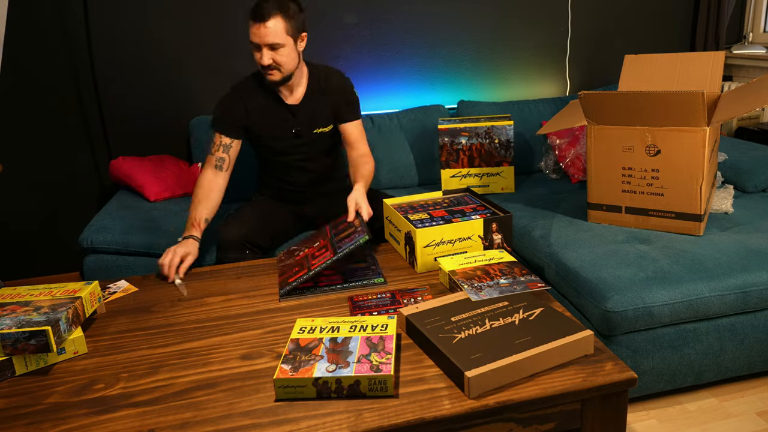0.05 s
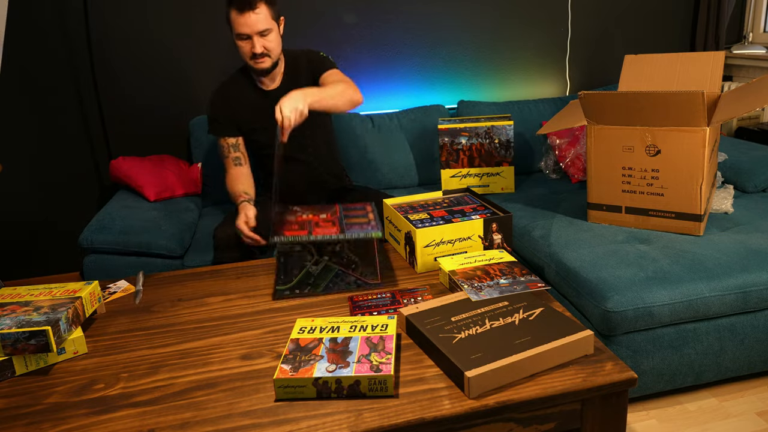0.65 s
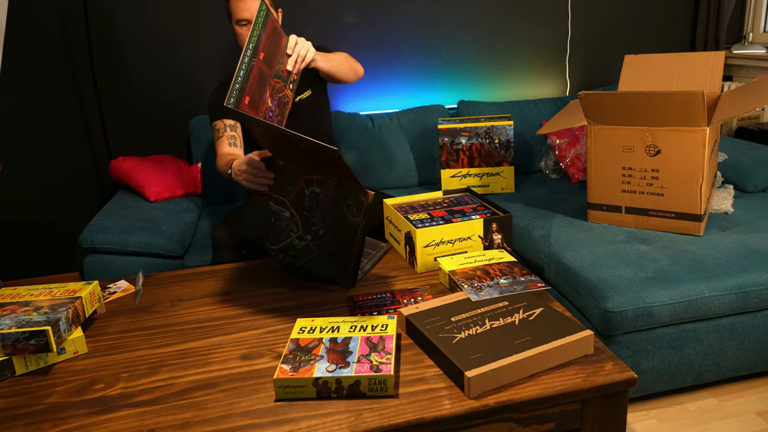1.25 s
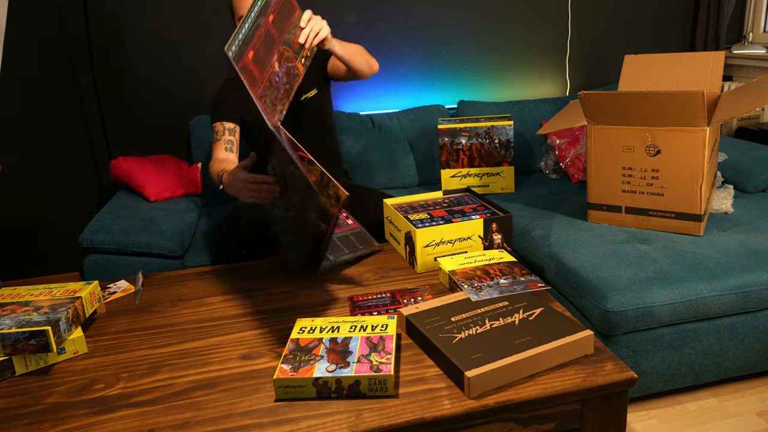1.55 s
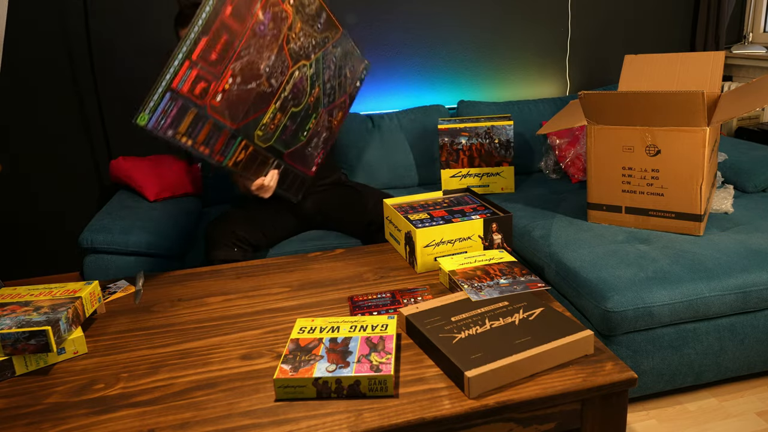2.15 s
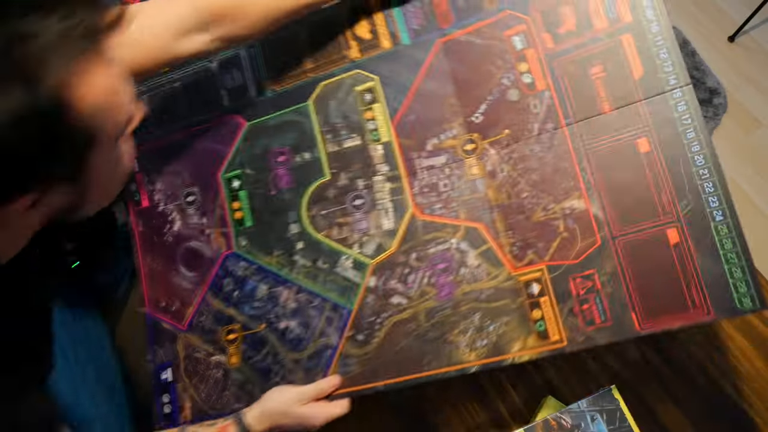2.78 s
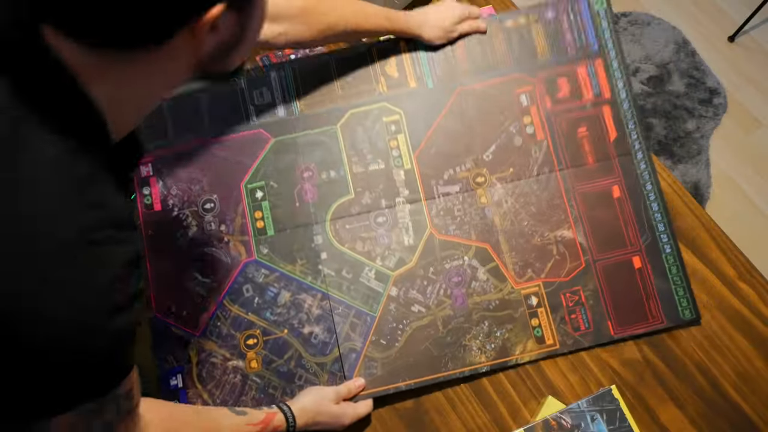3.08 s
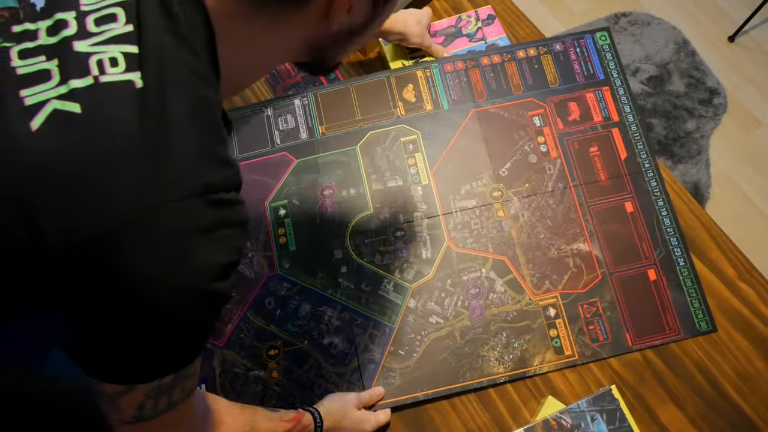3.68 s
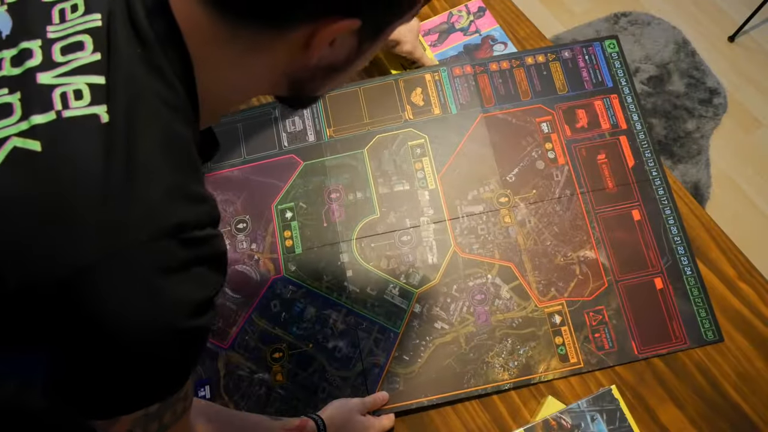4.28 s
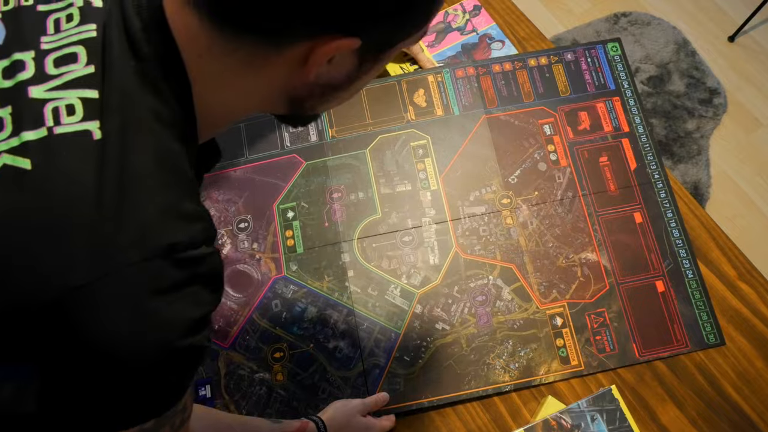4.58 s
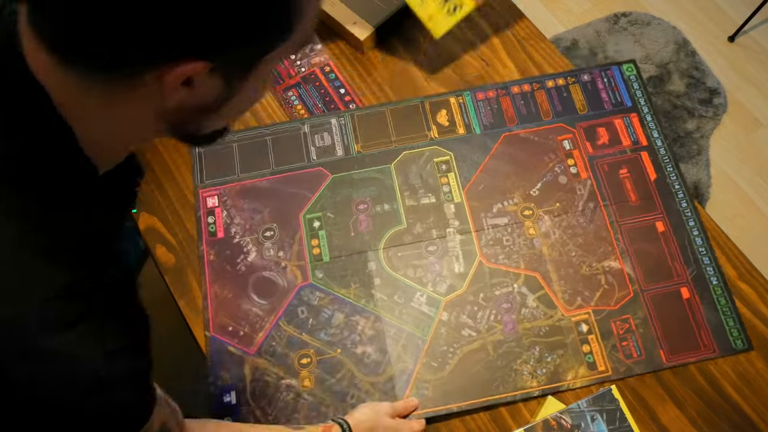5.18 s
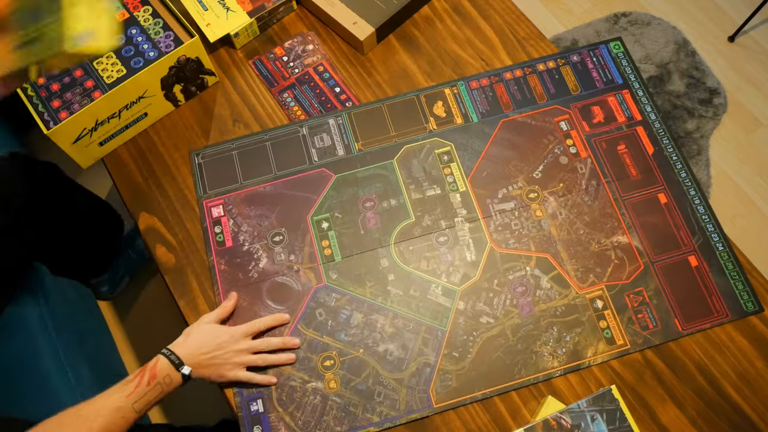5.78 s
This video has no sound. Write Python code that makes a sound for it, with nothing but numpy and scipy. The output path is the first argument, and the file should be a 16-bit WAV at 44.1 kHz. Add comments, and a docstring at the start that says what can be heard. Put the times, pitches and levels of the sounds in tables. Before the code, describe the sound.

A folded cardboard board knocks against a wooden table, with a few faint metallic clinks at first. Hands and sleeves brush over it while the panels flex, thump and fan the air, and the hinge groans briefly. About halfway it lands with the loudest knock, rattles and glides a little. Smaller taps follow, then a box is pushed aside and claps down, and light rubbing ends it. Heard through one microphone in a softly furnished room.

```python
"""A big folded cardboard game board is opened, swung through the air and dropped on a wooden table.
Its edges knock, its panels thud, chatter and fan the air, a hinge sticks and slips in a groan.
Hands and sleeves rub over it, and it judders and glides on the wood. Small metal things clink at first;
near the end a game box is pushed aside and set down with a clap. One microphone, a soft living room."""
import sys
import numpy as np
from scipy import signal
from scipy.fft import rfft, irfft
from scipy.io import wavfile
from scipy.ndimage import uniform_filter1d

SR = 44100
rng = np.random.default_rng(int(sys.argv[2]) if len(sys.argv) > 2 else 0)


def inscribe(sig):
    """Save sig as 16-bit PCM at rate SR to the path in sys.argv[1].

    A 1-D sig is mono; a 2-D sig holds one channel per row.
    Samples are clipped to [-1, 1] before scaling.
    """
    pcm = np.round(np.clip(np.atleast_2d(sig).T, -1, 1) * 32767)
    wavfile.write(sys.argv[1], SR, pcm.astype(np.int16))


N = 261733
TIME_S = np.arange(N) / SR
RING_S = TIME_S[:SR // 2]

# edges striking the table (time [s], body peak [dB], spot pitch [Hz], crack level [dB])
KNOCKS = [(0.212, -36, 525, -47.5), (0.265, -22, 476, -40), (0.339, -26, 920, -44), (0.349, -24, 467, -50),
          (0.948, -27.5, 434, -47), (0.979, -38, 360, -46.5), (1.758, -32.5, 786, -46),
          (1.77, -43, 704, -36), (1.778, -20.5, 379, -35), (1.894, -30, 417, -45.5), (1.967, -39, 422, -48),
          (2.273, -35.5, 610, -50), (2.794, -15, 470, -31), (3.104, -28, 790, -43),
          (3.197, -23, 420, -40.5), (3.292, 0.5, 448, -34.5), (3.306, -9.5, 444, -35.5),
          (3.312, -17.5, 376, -18), (3.367, -18, 576, -27.5), (3.376, -16.5, 377, -44),
          (3.424, -17.5, 447, -40), (3.573, -24, 406, -36.5), (3.595, -14, 480, -38.5),
          (3.641, -33.5, 436, -44), (3.859, -29, 398, -54), (4.05, -33, 402, -52),
          (4.269, -24.5, 498, -34.5), (4.277, -24.5, 816, -38.5), (4.293, -19, 382, -47),
          (4.323, -26.5, 407, -54), (4.661, -32.5, 414, -58), (4.714, -16, 477, -42),
          (4.743, -17.5, 393, -33.5), (4.756, -22, 400, -29.5), (4.839, -18.5, 553, -38),
          (4.869, -24, 580, -42.5), (5.324, -37.5, 775, -44), (5.351, -49, 700, -42),
          (5.823, -31, 565, -42)]
# board on the table (frequency [Hz], level [dB], t60 [s])
BOARD_MODES = [(177.3, -16, 0.21), (397, -9.5, 0.28), (468, -5.5, 0.072), (550, -3, 0.066),
               (670, -7, 0.081), (1006, -19.5, 0.06), (1187, -20, 0.057), (1665, -33, 0.09)]
# cardboard crack spectrum (frequency [Hz], level [dB])
CRACK_EQ = [(200, -11), (700, 11), (1100, 3), (1450, 2), (1900, 1.5), (2700, -3), (3400, -6), (4200, -13.5),
            (6000, -19), (10000, -28.5), (14000, -26), (16000, -53)]

def knocks(board_db=-13, crack_gain_db=11, ping_hz=1380, ping_db_per_oct=41, scatter_oct=0.17,
           contact_s=0.00091, lag_s=0.001207, spot_cycles=16, ping_cycles=22):
    """The edge cracks and pings, lower on soft contact; the struck spot rings briefly, the board longer."""
    out = np.zeros(N)
    for s, db, spot_hz, crack_db in KNOCKS:
        edge_hz = ping_hz * 2 ** ((crack_db - db) / ping_db_per_oct + scatter_oct * rng.standard_normal())
        ping = np.sin(2 * np.pi * edge_hz * RING_S) * fade(RING_S, ping_cycles / edge_hz)
        spot = np.sin(2 * np.pi * spot_hz * RING_S) * fade(RING_S, spot_cycles / spot_hz)
        board = undb(board_db) * ring(BOARD_MODES, scatter_db=5.5)
        onset = 1 - np.exp(-RING_S / contact_s)  # soft card passes the blow on gradually
        body = peaked((spot + board) * onset, db)
        crunch = peaked(crack(CRACK_EQ, t60_s=0.027), crack_db + crack_gain_db)
        add(out, s + lag_s, body + peaked(ping, crack_db + 1) + crunch)
    return out

# panels flexing (time [s], level [dB], pitch [Hz])
THUDS = [(.950, -29, 211), (.957, -28.5, 148), (1.782, -16, 101), (1.838, -23, 100.7), (1.867, -35, 150),
         (2.121, -29.5, 221), (2.14, -33, 137), (2.177, -27.5, 92), (2.274, -35.5, 195), (2.62, -29, 88),
         (2.672, -23, 90), (2.797, -23, 136), (2.802, -18, 303), (3.015, -26, 151.7), (4.294, -27.5, 264),
         (4.757, -26.5, 203), (5.001, -34, 207), (5.612, -30, 165), (5.791, -32.5, 93.5),
         (5.821, -32.5, 185), (5.906, -30.5, 231)]
# one panel (frequency [x pitch], level [dB], t60 [s])
PANEL_MODES = [(1, 3.5, 0.1), (1.45, -10, 0.13), (2.2, -5, 0.07), (3.3, -11.5, 0.069), (5.4, -18.5, 0.039)]

def thuds(gain_db=-1, contact_s=0.00097):
    """A panel swings to its stop and wobbles like a drum skin."""
    out = np.zeros(N)
    onset = 1 - np.exp(-RING_S / contact_s)
    for s, db, hz in THUDS:
        wobble = ring(PANEL_MODES, scatter_db=1.5, pitch=hz)
        add(out, s, peaked(wobble * onset, db + gain_db))
    return out

# hinge stick-slip (time [s], slip rate [Hz])
HINGE_SLIPS = [(2.355, 572), (2.415, 376.4), (2.445, 334), (2.494, 654), (2.52, 632), (2.562, 347),
               (2.608, 294)]

def hinge_groan(level_db=-29, db_per_oct=-9.5, fade_s=0.044):
    """The taped hinge sticks and slips at a sliding, unsteady rate; quicker slips are weaker."""
    s, hz = np.transpose(HINGE_SLIPS)
    rate_hz = np.interp(TIME_S, s, hz) * (1 + 0.03 * walk(220))
    bending = np.clip(np.minimum(TIME_S - s[0], s[-1] - TIME_S) / fade_s, 0, 1)
    gain = bending * undb(level_db + db_per_oct * np.log2(rate_hz / hz.min()) + 1.8 * walk(130))
    return gain * np.sin(2 * np.pi * np.cumsum(rate_hz) / SR)

# box corners landing (time [s], peak [dB])
BOX_CORNERS = [(5.1626, -19), (5.1645, -11), (5.1666, -17.5)]
# hollow box (frequency [Hz], level [dB], t60 [s])
BOX_MODES = [(350, -9, .04), (689, -4, .04), (2470, 0, .012)]

def box_ring(crack_db=-4):
    """Each corner cracks, and the hollow box gives a short note."""
    out = np.zeros(N)
    for s, db in BOX_CORNERS:
        note = ring(BOX_MODES, scatter_db=1)
        crunch = crack(CRACK_EQ, t60_s=0.022)
        add(out, s, peaked(note, db) + peaked(crunch, db + crack_db))
    return out

# clap spectrum (frequency [Hz], level [dB])
CLAP_EQ = [(120, 0), (650, 3), (1300, -4), (2000, -4), (2700, -3), (4000, -9), (6300, -16), (8000, -26),
           (16000, -35)]

def box_clap(time_s=5.165, peak_db=-9):
    """The flat bottom of the box lands with one pressure pulse."""
    out = np.zeros(N)
    pulse = colour(signal.unit_impulse(len(RING_S)), CLAP_EQ)
    add(out, time_s, peaked(pulse, peak_db))
    return out

def chatter(level_db=-14.5, db_per_db=1.255, length_s=0.1, pitch_hz=5020, db_per_oct=19, hiss_db=-24):
    """Loose panels chatter after each crack, softer and lower after a weak one; rows as in STROKES."""
    rows = []
    for s, _, _, crack_db in KNOCKS:
        db = level_db + db_per_db * crack_db
        hz = pitch_hz * 2 ** (crack_db / db_per_oct)
        rows.append((s + length_s / 2, length_s, db, hz, db + hiss_db))
    return rows

# hands and sleeves on card (centre [s], length [s], level [dB], panel resonance [Hz], hiss level [dB])
STROKES = [(0.04, 0.19, -52, 900, -88), (0.18, 0.21, -55, 1530, -56.5), (0.36, 0.23, -43.5, 1000, -80),
           (0.856, 0.55, -62.5, 1180, -60.5), (1.165, 0.21, -52.5, 1670, -60), (1.664, 0.3, -55, 1380, -75),
           (1.755, 0.081, -49, 1330, -57), (2.277, 0.32, -48.5, 790, -53.5), (2.503, 0.33, -46, 705, -51),
           (2.735, 0.22, -47.5, 655, -57.5), (3.24, 0.48, -52.5, 1110, -56.5),
           (3.637, 0.26, -58.5, 980, -75), (4.138, 0.24, -64, 2500, -63), (4.33, 0.14, -49.5, 860, -75),
           (4.785, 0.16, -49.5, 1880, -58), (5.03, 0.27, -49, 810, -60), (5.39, 0.26, -60, 1650, -51.5),
           (5.61, 0.43, -51, 850, -58), (5.817, 0.24, -43, 1490, -54)]
# sleeve friction spectrum (frequency [Hz], level [dB])
SLEEVE_EQ = [(300, -8.5), (700, 2), (1200, 2.5), (1700, -4), (2300, -6.5), (4000, -13), (5800, -18),
             (8000, -25.5), (14000, -67)]
# bright spectrum of skin hiss and ticks (frequency [Hz], level [dB])
BRIGHT_EQ = [(3000, 8.5), (6000, 4.5), (8000, -0.5), (10500, -1), (12500, 2.5), (14000, 6.5), (16000, 1)]

def rubbing(rows, resonance_db=-4, q=7, grip_db=2.5):
    """Each rub swells and fades: tiny slips ring the panel, and the printed surface hisses."""
    slips = reflected(colour(grains(rate_hz=14000, spread_db=3), SLEEVE_EQ))
    hiss = reflected(colour(grains(rate_hz=18000, spread_db=1), BRIGHT_EQ))
    out = np.zeros(N)
    for s, length_s, db, hz, hiss_db in rows:
        on = np.abs(TIME_S - s) < length_s / 2
        swell = np.cos(np.pi * (TIME_S[on] - s) / length_s)
        panel = unit(signal.lfilter(*signal.iirpeak(hz, q, fs=SR), slips[on]))
        rub = unit(slips[on] + undb(resonance_db) * panel)
        out[on] += swell * (undb(db) * rub + undb(hiss_db) * hiss[on])
    return out * undb(grip_db * walk(45))

# small metal things touching (time [s], level [dB], tilt [dB/oct])
CLINKS = [(.082, -36.5, 6), (0.088, -39, 5), (.106, -39, 6), (.263, -36, 2), (0.292, -39.5, 1),
          (.313, -38.5, -2), (.339, -38.5, -8)]
# thin metal (frequency [Hz], level [dB], t60 [s])
METAL_MODES = [(3424, 2, 0.29), (5656, -3, 0.078), (7920, 8, 0.043), (9420, -10, 0.15), (13100, -12, 0.11),
               (13300, 4, 0.023), (15400, -20, .2)]

def clinks(jangle_db=1, jangle_t60_s=0.087, partials=26, tick_db=-9, tick_t60_s=0.014):
    """Thin metal: a bright tick, a few fixed tones and a jangle that differs with each touch."""
    out = np.zeros(N)
    base_hz = METAL_MODES[0][0]
    for s, db, tilt in CLINKS:
        modes = [(hz, mode_db + tilt * np.log2(hz / base_hz), t60_s) for hz, mode_db, t60_s in METAL_MODES]
        jangle_hz = rng.uniform(2700, 14000, partials)
        jangle_modes = [(hz, (tilt - 3) * np.log2(hz / base_hz), jangle_t60_s) for hz in jangle_hz]
        tick = colour(rng.standard_normal(len(RING_S)) * fade(RING_S, tick_t60_s), BRIGHT_EQ)
        tones = ring(modes, scatter_db=1.5)
        jangle = ring(jangle_modes, scatter_db=9)
        add(out, s, peaked(tones, db) + peaked(jangle, db + jangle_db) + peaked(tick, db + tick_db))
    return out

# fingernail catches (time [s], peak [dB])
NAIL_TICKS = [(3.775, -42), (4.24, -39), (4.762, -28), (4.87, -29), (5.508, -40), (5.79, -35)]

def nail_ticks():
    """A fingernail catches crisply on the glossy print."""
    out = np.zeros(N)
    for s, db in NAIL_TICKS:
        add(out, s, peaked(crack(BRIGHT_EQ, t60_s=0.012), db))
    return out

# card pushed over the table (centre [s], length [s], level [dB])
PUSHES = [(0.04, 0.39, -51.5), (0.37, 0.17, -43.5), (1.74, 0.055, -46.5), (2.5, 0.67, -47.5),
          (4.17, 0.22, -49.5), (5.03, 0.17, -39.5), (5.58, 0.28, -46), (5.8, 0.15, -41)]
# edge friction spectrum (frequency [Hz], level [dB])
DRAG_EQ = [(120, -15.5), (260, -3), (400, -0.5), (520, -2), (680, -7.5), (900, -14), (2000, -45.5)]

def drag(skid_db=-34, db_per_db=0.7, skid_lag_s=0.054, skid_s=0.11, judder_db=1.5):
    """The edge judders over the wood when pushed, and skids briefly after each knock."""
    skids = [(s + skid_lag_s, skid_s, skid_db + db_per_db * db) for s, db, _, _ in KNOCKS]
    motion = gestures(PUSHES + skids, rest_db=-60)  # the held board never lies quite still
    judder = undb(judder_db * walk(45))
    friction = unit(colour(grains(rate_hz=3000, spread_db=2), DRAG_EQ))
    return motion * judder * friction

# board sliding flat (time [s], level [dB], squeal pitch [Hz])
GLIDE = [(3.36, -61, 15400), (3.45, -52.5, 14200), (3.6, -58, 11600), (3.71, -57.5, 12600),
         (3.82, -59.5, 11000), (4.0, -59, 10800), (4.05, -64, 9900)]
# varnish hiss spectrum (frequency [Hz], level [dB])
GLIDE_EQ = [(2000, -5), (3000, -0.5), (3800, -4.5), (4500, 3), (5100, -4.5), (5900, 3.5), (6600, -14),
            (7500, -13.5)]

def glide(squeal_db=-13):
    """The board's smooth back hisses over the varnish; a thin wavering squeal sinks as it slows."""
    s, db, hz = np.transpose(GLIDE)
    pitch_hz = np.interp(TIME_S, s, hz) * (1 + 0.008 * walk(300))
    squeal = undb(3 * walk(40)) * np.sin(2 * np.pi * np.cumsum(pitch_hz) / SR)
    hiss = unit(colour(rng.standard_normal(N), GLIDE_EQ))
    gain = undb(np.interp(TIME_S, s, db, left=-120, right=-120))
    return gain * (hiss + undb(squeal_db) * squeal)

def swish(time_s=2.74, length_s=0.17, level_db=-54, centre_hz=14200, q=8):
    """One fast light brush over the print gives a narrow, very high hiss."""
    hiss = signal.lfilter(*signal.iirpeak(centre_hz, q, fs=SR), rng.standard_normal(N))
    return gestures([(time_s, length_s, level_db)], rest_db=-np.inf) * unit(hiss)

# panel swings (centre [s], length [s], level [dB])
SWINGS = [(1.8, 0.17, -40.5), (2.35, 0.38, -50.5), (2.77, 0.39, -39.5), (3.5, 0.69, -50), (5.64, .1, -40.5),
          (5.81, 0.094, -38.5)]
# fanned air spectrum (frequency [Hz], level [dB])
AIR_EQ = [(20, -30), (45, 6.5), (90, 7), (170, 5), (280, 0.5), (600, -37)]

def draught():
    """The big panels fan air over the table."""
    return gestures(SWINGS, rest_db=-62.5) * unit(colour(rng.standard_normal(N), AIR_EQ))

# room decay (frequency [Hz], t60 [s])
ROOM_DECAY = [(100, 0.7), (400, 0.47), (1500, 0.43), (4000, 0.47), (14000, 0.83)]

def room_response(delay_s=0.007, build_s=0.0014):
    """Diffuse living-room echo of unit energy, fading octave by octave."""
    hz, t60_s = np.transpose(ROOM_DECAY)
    t = TIME_S[:SR]
    spectrum = rfft(rng.standard_normal(SR))
    bins_hz = np.arange(SR // 2 + 1)
    tail = np.zeros(SR)
    for low_hz in 40 * 2 ** np.arange(9):
        band = irfft(spectrum * ((bins_hz >= low_hz) & (bins_hz < 2 * low_hz)), SR)
        tail += band * fade(t, np.interp(np.log(low_hz * np.sqrt(2)), np.log(hz), t60_s))
    tail *= 1 - np.exp(-np.maximum(t - delay_s, 0) / build_s)
    return tail / np.sqrt(np.sum(tail ** 2))

# background spectrum (frequency [Hz], level [dB])
ROOM_TONE_EQ = [(20, -25), (60, -9), (150, 2), (450, -10), (1200, -1.5), (3000, -11.5), (8000, -18),
                (16000, -20.5)]

def room_tone(level_db=-61):
    """Faint steady noise of the room."""
    return undb(level_db) * unit(colour(rng.standard_normal(N), ROOM_TONE_EQ))

def ring(modes, scatter_db, pitch=1):
    """Decaying modes; each blow lands elsewhere and weights them differently."""
    offsets_db = scatter_db * rng.standard_normal(len(modes))
    return sum(undb(db + offset_db) * np.sin(2 * np.pi * hz * pitch * RING_S) * fade(RING_S, t60_s)
               for (hz, db, t60_s), offset_db in zip(modes, offsets_db))

def crack(eq, t60_s):
    """A brief burst of crunching fibres."""
    return colour(rng.choice([-1., 1.], len(RING_S)) * fade(RING_S, t60_s), eq)

def grains(rate_hz, spread_db):
    """Dense tiny slips of uneven size."""
    sizes = undb(spread_db * np.minimum(rng.exponential(size=N), 4))
    return unit((rng.random(N) < rate_hz / SR) * sizes * rng.standard_normal(N))

def reflected(x, lag_s=0.00156, share=0.56):
    """The moving board adds a reflection with a changing delay, so the colour sweeps."""
    delay_s = lag_s * np.exp(0.3 * walk(4))
    return unit(x + share * np.interp(TIME_S - delay_s, TIME_S, x))

def gestures(rows, rest_db):
    """Gain of smooth arm movements: each gathers speed and slows again."""
    swells = (undb(db) * np.exp(-(2 * (TIME_S - s) / length_s) ** 2) for s, length_s, db in rows)
    return np.sqrt(undb(rest_db) ** 2 + sum(swell ** 2 for swell in swells))

def walk(rate_hz):
    """Smooth random wander, rms 1."""
    hold = max(int(SR / rate_hz), 1)
    steps = np.repeat(rng.standard_normal(N // hold + 1), hold)
    return unit(uniform_filter1d(steps, hold)[:N])

def colour(x, eq, size=4096):
    """Minimum-phase filter through (frequency [Hz], level [dB]) points."""
    hz, db = np.transpose(eq)
    bins_hz = np.maximum(np.arange(size // 2 + 1) * SR / size, 1)
    gain = undb(np.interp(np.log(bins_hz), np.log(hz), db))
    cepstrum = irfft(np.log(gain))
    cepstrum[1:size // 2] *= 2
    cepstrum[size // 2 + 1:] = 0
    impulse = irfft(np.exp(rfft(cepstrum)))
    return signal.fftconvolve(x, impulse)[:len(x)]

def undb(db):
    """Decibels to gain."""
    return 10 ** (np.asarray(db) / 20)

def unit(x):
    """Scale to rms 1."""
    return x / np.sqrt(np.mean(x ** 2))

def peaked(x, db):
    """Scale to a peak level."""
    return x * undb(db) / np.abs(x).max()

def fade(t, t60_s):
    """Exponential decay."""
    return np.exp(-np.log(1000) * t / max(t60_s, 1e-4))

def add(track, time_s, sound):
    """Mix a sound in at a time."""
    start = max(int(time_s * SR), 0)
    track[start:start + len(sound)] += sound[:len(track) - start]

def scene(low_cut_hz=65):
    """Blows and groan excite the room, the box's clap most; friction and air stay dry."""
    sends = [(knocks(), -10), (thuds(), -11), (clinks() + nail_ticks(), -8),  # (signal, echo send [dB])
             (box_ring(), -12), (box_clap(), 5), (hinge_groan(), -8)]
    direct = sum(x for x, _ in sends)
    echo = signal.fftconvolve(sum(x * undb(db) for x, db in sends), room_response())[:N]
    # open panels radiate little deep bass
    low_cut = signal.butter(2, low_cut_hz, "high", fs=SR, output="sos")
    blows = signal.sosfilt(low_cut, direct + echo)
    background = room_tone()
    handling = rubbing(STROKES + chatter()) + swish() + drag() + draught() + glide()
    return (blows + handling + background)[None]

def record(dry, top_hz=16000):
    """The recorder clips at full scale and cuts the top."""
    low_pass = signal.ellip(10, 0.2, 70, top_hz, fs=SR, output="sos")
    return signal.sosfilt(low_pass, np.clip(dry, -1, 1))

dry = scene()
out = record(dry)
inscribe(out)
```